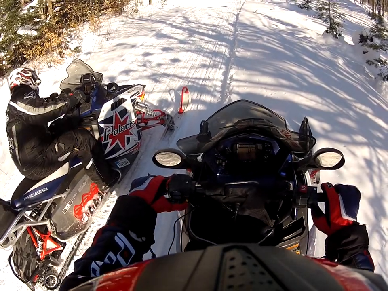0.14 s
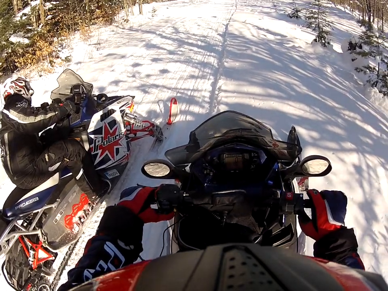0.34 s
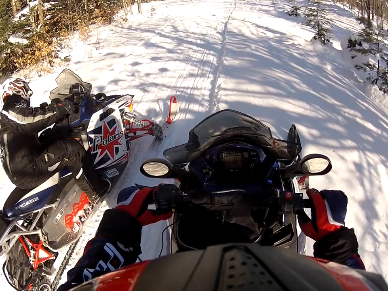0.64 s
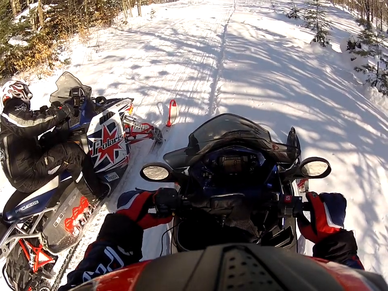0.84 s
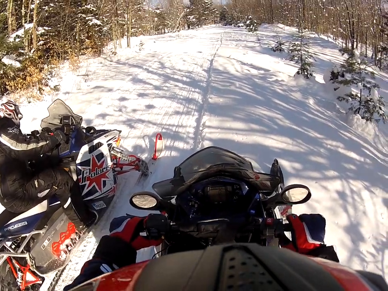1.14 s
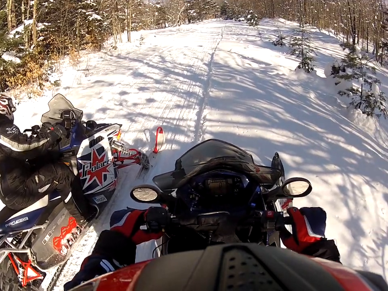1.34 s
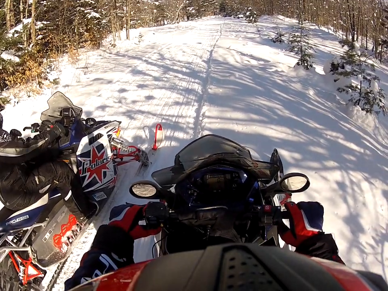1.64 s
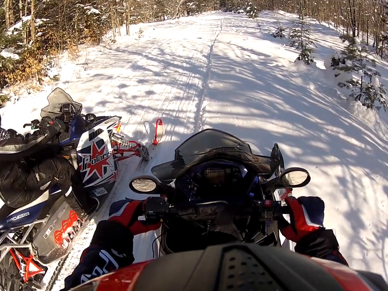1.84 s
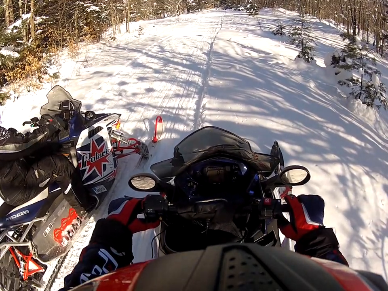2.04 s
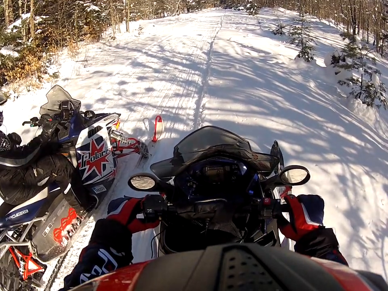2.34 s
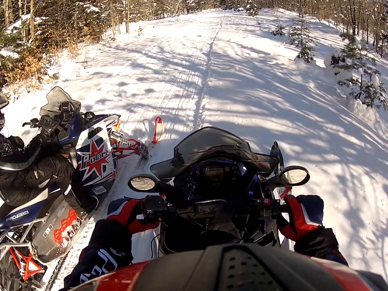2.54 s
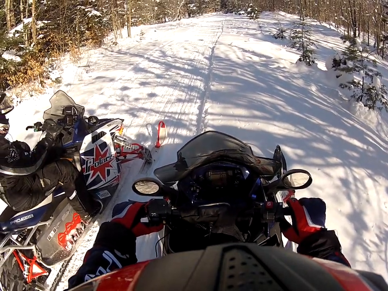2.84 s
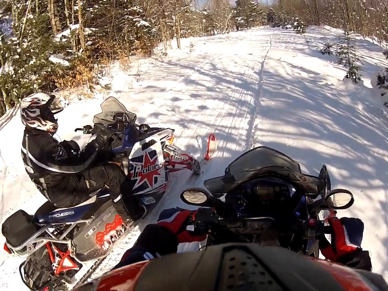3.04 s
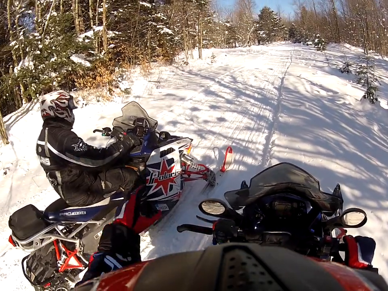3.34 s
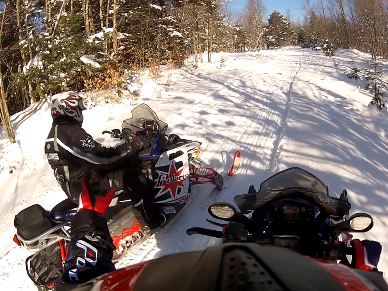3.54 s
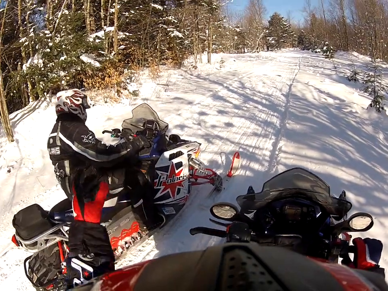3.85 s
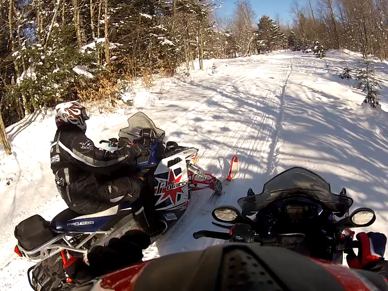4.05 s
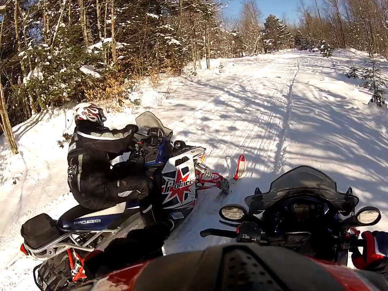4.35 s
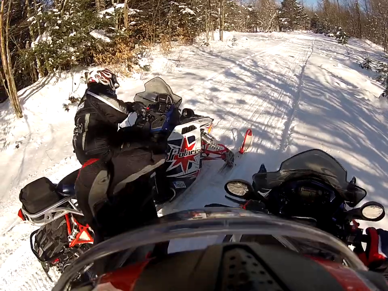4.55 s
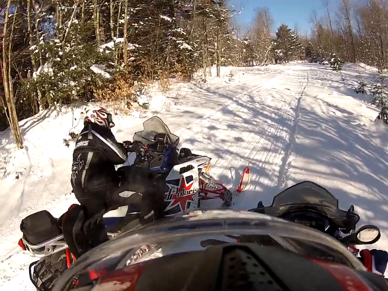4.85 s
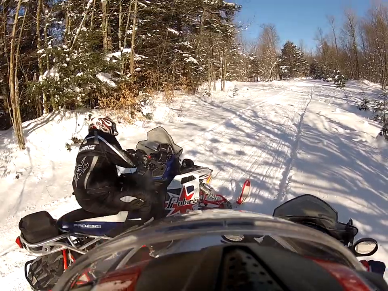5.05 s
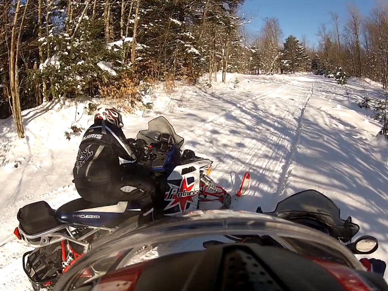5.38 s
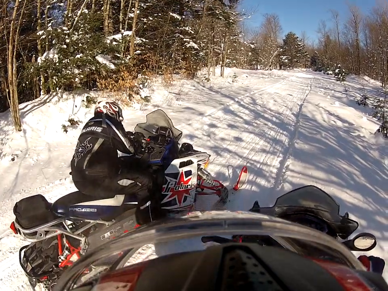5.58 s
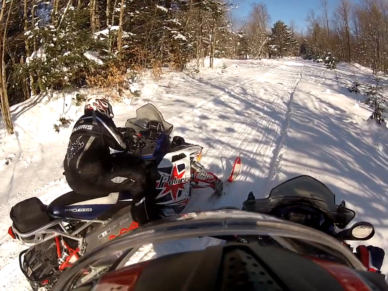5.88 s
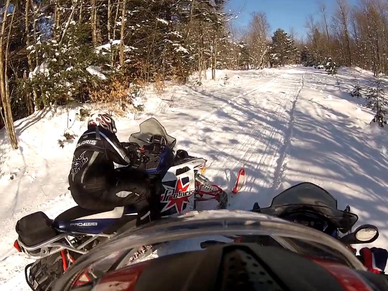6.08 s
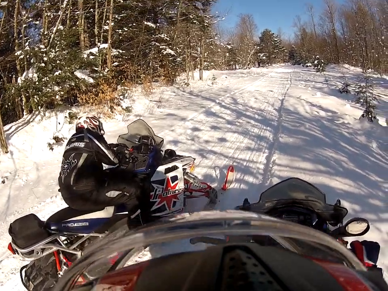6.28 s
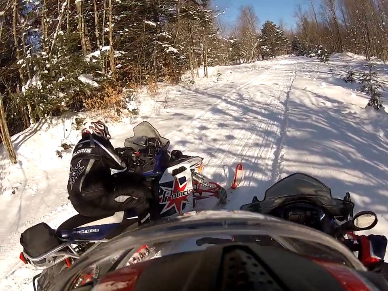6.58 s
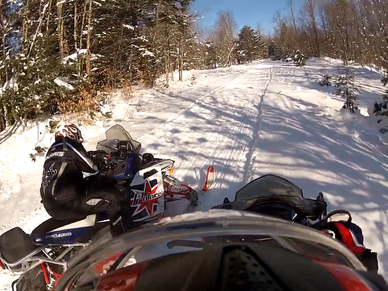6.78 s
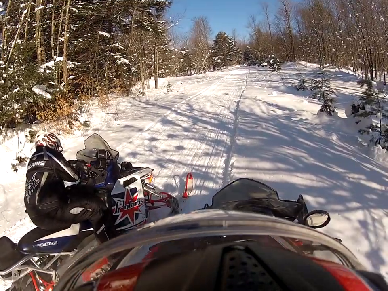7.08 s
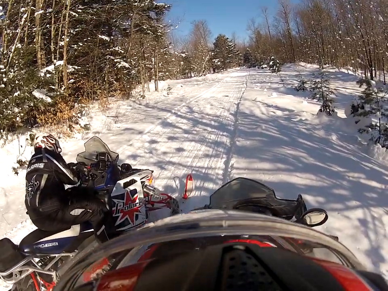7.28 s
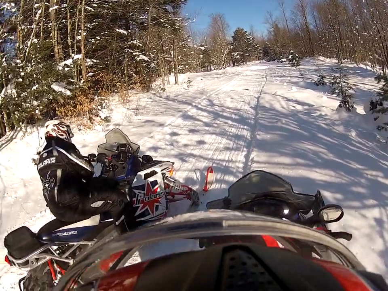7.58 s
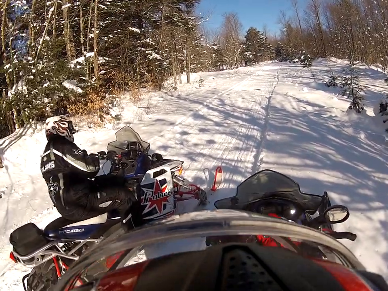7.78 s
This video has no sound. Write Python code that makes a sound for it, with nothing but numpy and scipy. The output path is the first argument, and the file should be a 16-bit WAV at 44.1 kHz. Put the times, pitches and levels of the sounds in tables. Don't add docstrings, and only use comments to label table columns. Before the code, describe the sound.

Two snowmobiles idle with a low, lumpy, sputtering putter and faint metal rattle; midway a helmet visor scrapes and slams with one overloaded thump.

```python
import sys
import numpy as np
from scipy import signal
from scipy.fft import rfft, irfft, next_fast_len
from scipy.io import wavfile
from scipy.ndimage import uniform_filter1d, map_coordinates

SR = 44100
rng = np.random.default_rng(int(sys.argv[2]) if len(sys.argv) > 2 else 0)


def ratio_of_db(decibels):
    return 10 ** (np.asarray(decibels, float) / 20)


def generate_wav(sig):
    pcm = np.round(np.clip(np.atleast_2d(sig).T, -1, 1) * 32767).astype(np.int16)
    wavfile.write(sys.argv[1], SR, pcm)


N = 349255
T = np.arange(N) / SR


def noise():
    return rng.standard_normal(N)


def unit(x):
    return x / np.sqrt(np.mean(x ** 2) + 1e-20)


def wobble(rate):
    knots = rng.standard_normal(int(N * rate / SR) + 4)
    return map_coordinates(knots, [T * rate])


def coloured(x, points):
    m = 2 * next_fast_len(x.shape[-1] // 2 + SR // 4)
    hz, gain_db = np.transpose(points)
    db = np.interp(np.log(np.fft.rfftfreq(m, 1 / SR) + 1), np.log(hz + 1), gain_db)
    cepstrum = irfft(np.log(ratio_of_db(db) + 1e-7), m)
    cepstrum[1:m // 2] *= 2
    cepstrum[m // 2 + 1:] = 0
    response = np.exp(rfft(cepstrum))
    return irfft(rfft(x, m) * response, m)[..., :x.shape[-1]]


def firings(hz, drift, scatter_db):
    turns = np.cumsum(hz * (1 + drift * wobble(5))) / SR + 1
    charge_db = scatter_db * np.clip(noise(), -3, 1.3)
    return np.diff(np.floor(turns), prepend=0) * ratio_of_db(charge_db)


def exhaust(pulses, level_db, pipe):
    return coloured(pulses * ratio_of_db(level_db), pipe) / np.std(coloured(pulses, pipe))


def blow(pulses, pipe):
    response = coloured(signal.unit_impulse(SR // 2), pipe)
    return coloured(pulses, pipe) / np.abs(response).max()


# time in seconds, level in dB.
FOUR_STROKE_LOAD = [(0, -37), (.3, -40.5), (.8, -38), (1.1, -43.5), (1.35, -37), (1.6, -39.5), (2, -42.5),
                    (2.25, -36), (2.6, -41.5), (3, -38.5), (3.5, -42), (3.88, -37.5), (4.2, -38.5),
                    (5, -42.5), (5.3, -40.5), (6.2, -43), (7.2, -38.5), (7.92, -41.5)]
# middle in seconds, length in seconds, depth in dB.
STUMBLES = [(0.638, 0.075, 8), (1.073, 0.038, 8), (1.652, 0.097, 13), (1.842, 0.051, 8), (2.42, .04, 9),
            (2.543, .07, 10), (3.098, 0.1, 9.5), (5.62, 0.13, 24), (6.08, 0.029, 21), (6.7, 0.096, 18),
            (7.015, 0.052, 13), (7.165, 0.074, 17), (7.524, 0.065, 4), (7.77, 0.043, 8)]


def engines():
    lull_db = sum(depth_db * np.exp(-(2 * (T - s) / length) ** 4) for s, length, depth_db in STUMBLES)
    near_db = -39 + 1.7 * wobble(14) - lull_db
    load_s, load_db = np.transpose(FOUR_STROKE_LOAD)
    far_db = np.interp(T, load_s, load_db) + 1.4 * wobble(12) - 1.1 * lull_db
    bark_db = -52 + 1.1 * wobble(2.874) - 0.11 * lull_db
    two_hz = 60 * (1 - .006 * lull_db + .02 * np.tanh(wobble(13)))
    two = firings(two_hz, drift=.008, scatter_db=2.7)
    four = firings(41, drift=.02, scatter_db=2.5)
    hard = hard_firings(two)
    return boom(two, four, hard, near_db, far_db) + bark(two, four, hard, bark_db) + clatter(two, four)


# time in seconds, peak level in dB.
POPS = [(0.286, -37), (0.563, -30.5), (1.049, -38), (1.115, -34.5), (1.423, -38), (1.897, -33), (2.47, -37),
        (2.601, -35.5), (2.882, -34.5), (3.148, -35.5), (3.326, -36), (3.506, -38.5), (3.584, -37.5),
        (4.327, -40), (4.404, -42), (4.491, -31), (4.914, -35), (5.106, -35), (5.214, -43), (5.281, -36),
        (5.342, -38.5), (5.796, -36), (6.034, -38), (6.549, -36), (6.631, -42), (6.99, -38.5), (7.241, -36),
        (7.814, -29)]
# first and last time in seconds, peak level in dB.
RUNS = [(0.055, 0.206, -41.5), (0.322, .45, -40.5), (.697, 0.843, -42), (.906, 0.949, -37),
        (1.205, 1.307, -36), (1.505, 1.614, -38.5), (1.7, 1.792, -39.5), (2.047, 2.306, -41.5),
        (2.715, 2.767, -37.5), (2.991, 3.029, -41.5), (3.388, 3.441, -39.5), (3.676, 3.778, -43),
        (3.943, 4.128, -40), (4.207, 4.26, -39), (5.444, 5.496, -37), (5.576, 5.675, -38.5),
        (5.921, 5.972, -38), (6.132, 6.29, -39.5), (6.366, 6.47, -39.5), (6.711, 6.909, -39.5),
        (7.074, 7.135, -38), (7.349, 7.461, -40.5), (7.534, 7.583, -41), (7.618, 7.719, -40.5)]


def hard_firings(pulses):
    hard, at = np.zeros(N), np.flatnonzero(pulses)
    pops = list(POPS)
    gap_s = .047
    for first, last, db in RUNS:
        for s in np.linspace(first, last, round((last - first) / gap_s) + 1):
            pops.append((s, db + 1.7 * rng.standard_normal()))
    for s, db in pops:
        nearest = at[np.argmin(np.abs(at - s * SR))]
        hard[nearest] = -ratio_of_db(min(db, -32))
    return hard


# frequency in Hz, gain in dB.
TWO_STROKE_PIPE = [(20, -34.5), (45, -31), (70, -6), (100, -4), (120, -4.5), (137, 6.5), (157, -30.5),
                   (400, -76), (2000, -120)]
# frequency in Hz, gain in dB.
FOUR_STROKE_MUFFLER = [(20, -10), (43, -21), (65, -2.5), (82, -4.5), (100, 3.5), (125, -22.5), (160, -18.5),
                       (400, -55), (2000, -120)]
# frequency in Hz, density in dB per Hz.
SEAT_SHUDDER = [(15, 2), (32, -0.5), (45, -8), (70, -30), (200, -80)]


def boom(two, four, hard, near_db, far_db):
    steady = exhaust(two, near_db, TWO_STROKE_PIPE) + exhaust(four, far_db - 3.5, FOUR_STROKE_MUFFLER)
    pops = ratio_of_db(2.5) * blow(hard, FOUR_STROKE_MUFFLER) + ratio_of_db(-5) * blow(hard, TWO_STROKE_PIPE)
    shudder = ratio_of_db(-64.5 + 2.1 * wobble(10)) * unit(coloured(noise(), SEAT_SHUDDER))
    return steady - pops + shudder


# frequency in Hz, gain in dB.
UPPER_PIPE = [(100, -56.5), (160, -30), (195, -4.5), (228, -7), (248, -0.5), (265, -5.5), (285, -8.5),
              (310, -5.5), (330, -12), (360, -19), (409, -19), (520, -39.5), (900, -44), (20000, -120)]


def bark(two, four, hard, bark_db):
    burst = ratio_of_db(-60 * T[:900] / 0.053)
    jets = np.convolve(two + .5 * four, burst)[:N] * noise()
    steady = exhaust(two, bark_db - 10, UPPER_PIPE) + exhaust(jets, bark_db - 2.5, UPPER_PIPE)
    return steady - ratio_of_db(-2.5) * blow(hard, UPPER_PIPE)


# frequency in Hz, density in dB per Hz.
METAL_MODES = [(450, -6), (772, -13), (910, -4), (997, -12.5), (1270, 0.5), (1450, -9), (1600, -2),
               (1790, -8), (2090, -0.5), (2300, -6.5), (2560, -16.5), (2740, -9), (3050, -19), (3600, -13)]


def clatter(two, four):
    puff = uniform_filter1d(two + four, size=300)
    rattle = noise() * (1 + 0.17 * unit(puff)) * ratio_of_db(0.95 * wobble(15))
    modes = [(200, -34), *METAL_MODES, (4050, -35.5), (20000, -120)]
    return ratio_of_db(-54 - 0.24 * T) * unit(coloured(rattle, modes))


# start in seconds, length in seconds, rms level in dB, squeak share from 0 to 1.
SCRAPES = [
    (4.481, 0.04, -12.5, 0.7),
    (4.525, 0.02, -17, 0.55),
    (4.561, 0.017, -21.5, 0.56),
    (4.587, 0.031, -23.5, 0.57),
    (4.466, 0.23, -38, 0.19),
    (4.435, 0.039, -40.5, 0.37),
    (4.6539, 0.0095, -6.5, 0),
    (4.663, 0.009, -27, 0),
]
# middle in seconds, frequency in Hz, level in dB, width in seconds.
PUSHES = [(4.243, 38, -27, .02), (4.348, 80, -23, .005), (4.514, 50, -15, .009), (4.5328, 76, -.5, .0047),
          (4.551, 52, -13, .007), (4.567, 62, .5, .0056), (4.6005, 64, -5.5, .006), (4.623, 55, -14, .008),
          (4.642, 45, -21, .005), (4.6596, 150, 8, .0013), (4.6615, 2170, 5.5, .001)]
# start in seconds, frequency in Hz, level in dB,
# 60 dB decay in seconds, rise in seconds.
SLAM = [
    (4.654, 70, 0, .22, .003),
    (4.6542, 84, 10.5, .045, .007),
    (4.654, 69, -17, .6, .003),
    (4.66, 221, -26, .1, .002),
]
# frequency in Hz, density in dB per Hz.
DRAG = [(180, -44), (300, -24), (620, -4), (722, -7), (1190, -5), (1910, -3.5), (2590, -28.5), (3470, -11),
        (4000, -36), (5200, -68), (8800, -120)]
# frequency in Hz, density in dB per Hz.
SHELL_THUD = [(60, -37), (130, -3), (200, 0), (300, -13.5), (500, -16), (2000, -92.5)]


def visor():
    rubbing = noise() * ratio_of_db(1.6 * wobble(400))
    broad = unit(coloured(rubbing, DRAG))
    squeak = unit(coloured(rubbing, [(300, -38.5), (1500, -5.5), (1950, 3.0), (2350, -7.5),
                                     (2900, -28.5), (20000, -78.5)]))
    thud = unit(coloured(noise(), SHELL_THUD))
    out = ratio_of_db(-32) * np.sin(np.pi * np.clip((T - 4.49) / 0.12, 0, 1)) * thud
    for s, length, db, share in SCRAPES:
        stroke = np.sin(np.pi * np.clip((T - s) / length, 0, 1) ** 1.01)
        out += ratio_of_db(db) * stroke * (share * squeak + (1 - share) * broad)
    for s, hz, db, width in PUSHES:
        out += ratio_of_db(db) * np.sin(2 * np.pi * hz * (T - s)) * np.exp(-.5 * ((T - s) / width) ** 2)
    for s, hz, db, t60, rise in SLAM:
        t = np.maximum(T - s, 0)
        out -= ratio_of_db(db - 60 * t / t60) * np.sin(2 * np.pi * hz * t) * (1 - np.exp(-t / rise))
    return out


# time in seconds, peak level in dB, ring in Hz,
# weight in dB (heavy contacts are duller).
TICKS = [(0.395, -29, 1630, -6), (0.419, -33, 1480, -9), (1.034, -32.5, 1650, -7), (3.175, -28, 2160, 2),
         (3.195, -35, 2130, 2), (3.306, -27.5, 2180, 1), (3.38, -32, 2230, 3), (3.442, -32, 2130, 4),
         (3.481, -38, 1690, 7), (4.081, -26.5, 1310, 7.5), (4.157, -28.5, 1340, 3.5),
         (4.249, -36, 1300, 26), (4.276, -32, 2210, 13), (4.287, -28, 1500, 11), (4.342, -12, 1500, 13.5),
         (4.372, -35.5, 2170, 3), (4.448, -26.5, 1780, 9), (4.688, -35, 2000, 4), (4.77, -40, 1220, 19),
         (4.816, -28, 1550, 5), (4.919, -31, 1870, 3), (5.008, -35, 2400, 7), (5.711, -35, 2110, 9),
         (5.75, -34.5, 1300, -6), (5.772, -35, 2040, 6), (6, -33, 1380, 8), (6.528, -28.5, 1340, 12),
         (6.761, -31.5, 1270, -7.5), (7.696, -29.5, 2240, 3.5), (7.749, -33.5, 2240, 11)]
# time in seconds, peak level in
# dB, ring in Hz.
FAINT_TICKS = [
    (4.199, -40, 1610),
    (6.152, -38.5, 1545),
    (6.31, -36.5, 1260),
    (6.444, -36.5, 1360),
    (7.784, -40, 1290),
]


def ticks():
    out, t = np.zeros(N + SR), T[:2000]
    faint = [(*row, 3) for row in FAINT_TICKS]
    for s, db, hz, weight_db in [*TICKS, *faint]:
        low_db = -20 + 0.71 * weight_db
        high_db = min(-20 - 1.4 * weight_db, -19)
        crack = rng.standard_normal(len(t)) * ratio_of_db(-60 * t / .026) * (1 - np.exp(-t / .001))
        crack[40] = 3
        shell = [(120, low_db - 25.0), (480, low_db + 1.5), (900, min(low_db + 4.5, -5)), (1150, -6.5),
                 (hz + 1, 0), (2400, -7), (2900, high_db + 4.5), (3700, high_db + 7.5),
                 (4200, -34), (20000, -90)]
        tick = coloured(crack, sorted(shell))
        start = round((s - .001) * SR)
        out[start:start + len(t)] += ratio_of_db(db - 1.5) * tick / np.abs(tick).max()
    return out[:N]


# start in seconds, full contact in seconds, lift in seconds, level in dB.
STROKES = [
    (2.94, 3.023, 3.16, -49.5),
    (5.68, 5.72, 6, -61.5),
    (6.81, 6.868, 6.95, -50),
    (7.54, 7.663, 7.7, -53.5),
]
# frequency in Hz, density in dB per Hz.
CLOTH = [(260, -50), (500, -11.5), (780, -16), (1100, -10), (1600, -3), (2200, -3), (2700, -12),
         (3620, -10), (4000, -33), (8800, -120)]


def rustle():
    level = np.zeros(N)
    for start, full, lift, db in STROKES:
        contact = np.interp(T, [start, full, lift, lift + .05], [0, 1, 1, 0])
        level += ratio_of_db(db) * contact ** 0.74
    grains = noise() * ratio_of_db(1.6 * wobble(300))
    return level * unit(coloured(grains, CLOTH))


def scene():
    since = np.maximum(T - SLAM[0][0], 0)
    duck = ratio_of_db(-16 * (1 - np.exp(-since / 0.0098)) * np.exp(-(since / 0.11) ** 2))
    hiss = ratio_of_db(-70.5) * noise()
    background = duck * (engines() + rustle() + hiss)
    return np.tile(background + ticks() + visor(), (2, 1))


def roll_off(x):
    return signal.sosfilt(signal.butter(12, 16100, fs=SR, output="sos"), x)


# frequency in Hz, gain in dB.
TREBLE_TOP = [(100, 0), (8000, 0), (13000, 1.5), (15200, 1.5), (15500, -12), (15800, -30), (15850, -60),
              (16300, -60)]
# frequency in Hz, gain in dB.
SIDE_NOISE = [(100, -30), (500, 0), (1500, -12), (3200, 0), (3700, -25), (4400, -25), (4800, -3),
              (6000, -20), (20000, -40)]


def record(dry):
    slow = np.clip(signal.resample_poly(dry, 80, 441, axis=1), -1, 1)
    held = signal.resample_poly(np.repeat(slow, 6, axis=1), 147, 160, axis=1)[:, :N]
    last_overload = T[np.abs(held[0]) > .98].max(initial=0)
    since = T - last_overload + 0.0099
    recovery = .09 * np.exp(-np.abs(since) / 0.0073) - 0.063 * since * (since < .17)
    offset = (since > 0) * recovery
    side = offset * (1 + .15 * held[0]) + ratio_of_db(-97) * unit(coloured(noise(), SIDE_NOISE))
    mix = np.clip(coloured(held, TREBLE_TOP) + [side, -side], -1, 1)
    return roll_off(mix)


dry = scene()
out = record(dry)
generate_wav(out)
```